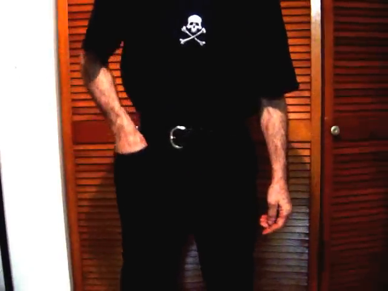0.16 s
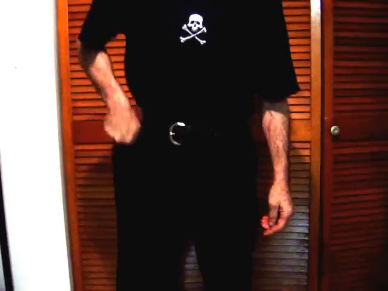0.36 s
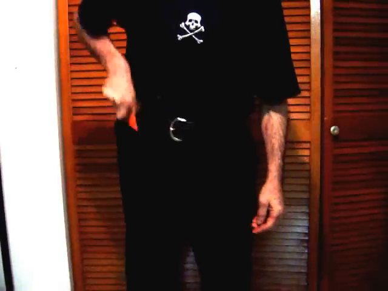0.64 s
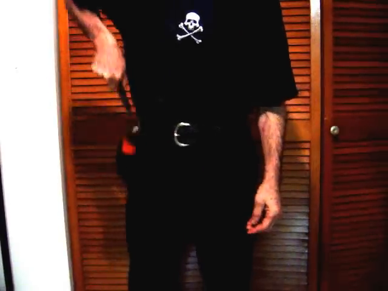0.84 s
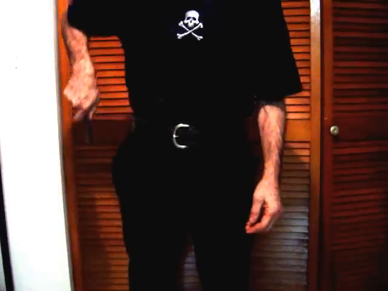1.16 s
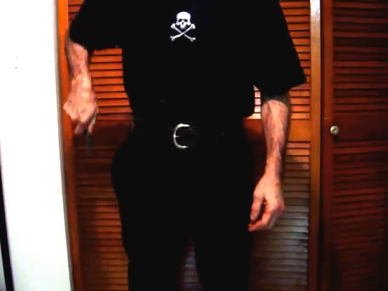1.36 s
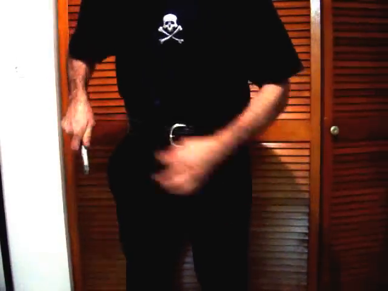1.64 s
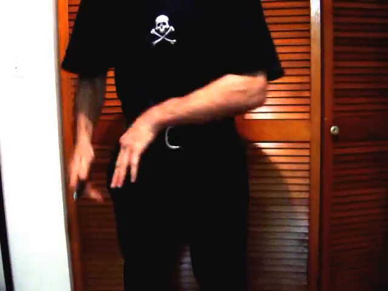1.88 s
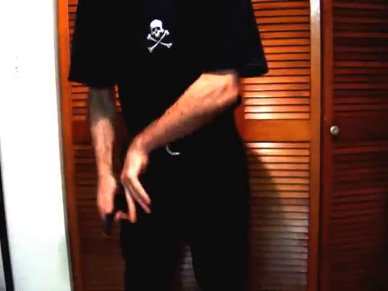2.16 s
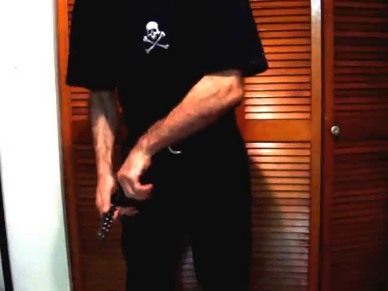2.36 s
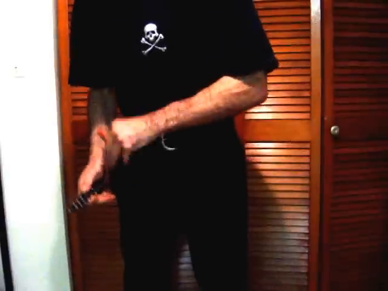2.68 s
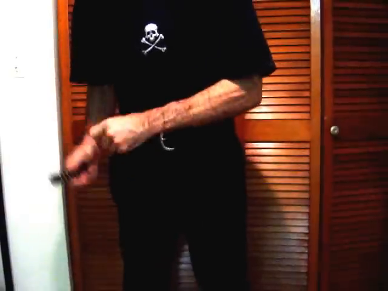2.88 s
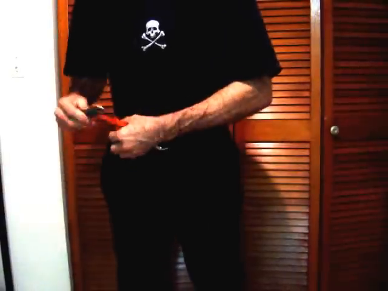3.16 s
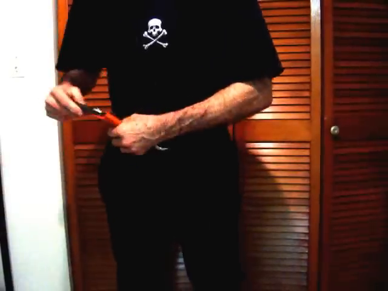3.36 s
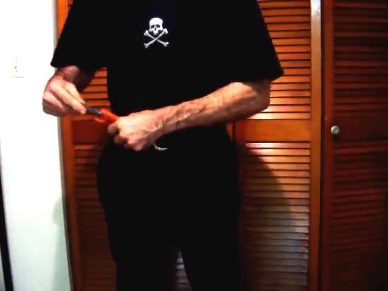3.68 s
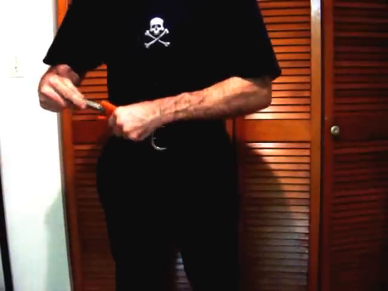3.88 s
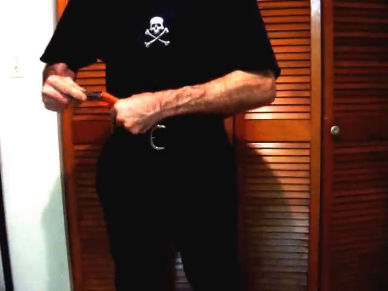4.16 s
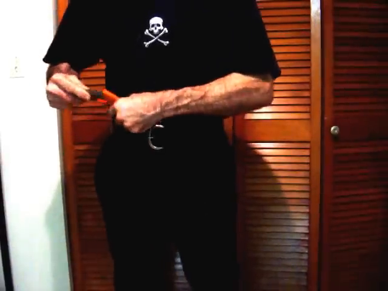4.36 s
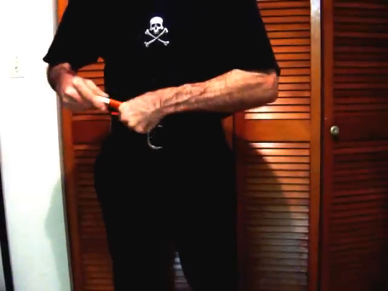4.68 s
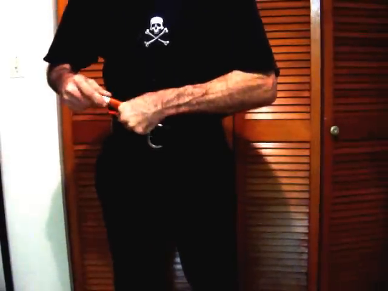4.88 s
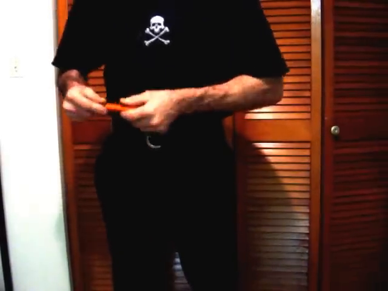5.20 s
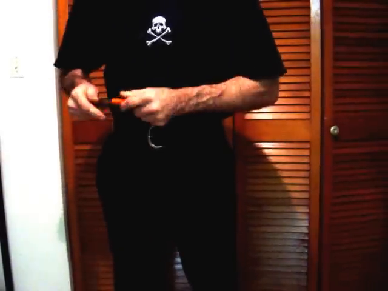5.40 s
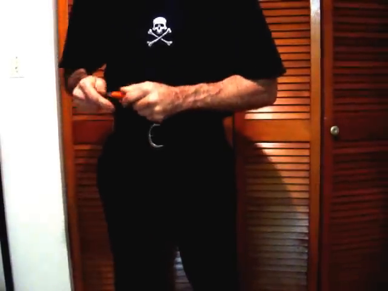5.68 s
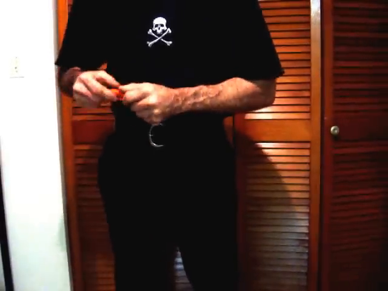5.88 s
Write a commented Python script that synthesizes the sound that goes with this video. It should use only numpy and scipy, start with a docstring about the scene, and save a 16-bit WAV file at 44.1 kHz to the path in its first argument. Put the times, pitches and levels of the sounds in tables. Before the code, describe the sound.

Steady hiss and a faint, fitful motor whir with tiny chirps near the microphone. Cloth rubs as a hand leaves a pocket, then a sharp loud knife clack with a short rattle. Soft rustles and small clicks follow, then a moderate clack, light ticks, two hard bright clacks and a final very loud snap. Small bare room, short echoes, rough mono microphone.

```python
"""Small bare room: a folding knife is drawn from a pocket sheath, flipped and pushed back.
Floor: flickering hiss and wavering mains partials. Motor near the microphone: narrow noise whir, sine chirps.
Cloth: two colours of noise swelling in strokes. Knife: contacts and rattle ring a bank of resonances,
heard with wall echoes and a tail. The recorder bends loud clacks, thumps, band-limits and clips."""
import sys
import numpy as np
from scipy import signal
from scipy.io import wavfile

SR = 44100
rng = np.random.default_rng(int(sys.argv[2]) if len(sys.argv) > 2 else 0)


def int16_out(signal):
    """Quantize to a 16-bit WAV file."""
    q = np.round(np.clip(np.atleast_2d(signal).T, -1, 1) * 32767)
    wavfile.write(sys.argv[1], SR, q.astype(np.int16))


N = 266187

# hiss colour, relative: f/Hz, level/dB per Hz
HISS_COLOUR = [(18, -42.5), (30, -18), (190, -1), (236, -3), (287, -1.5), (1170, -3), (1530, -13),
               (1960, -9), (9960, -13), (12900, -29.5), (21900, -120)]
# mains partials: f/Hz, mean level/dB rms
MAINS_PARTIALS = [(242.2, -68.5), (360.7, -70.5)]
# clearest motor chirps: t/s, length/s, first f/Hz, last f/Hz, level/dB before throb and flutter
CLEAR_CHIRPS = [(.008, 0.038, 1755, 1580, -48), (0.568, 0.04, 1640, 1630, -50.5),
                (0.657, 0.038, 1710, 1790, -49), (1.503, 0.043, 1710, 1650, -52),
                (0.054, 0.042, 1533, 1680, -41), (0.29, 0.042, 1503, 1646, -43),
                (2.397, 0.041, 1695, 1543, -40), (2.429, .1, 1935, 1906, -51),
                (2.536, 0.017, 1404, 1570, -46), (2.561, 0.037, 1380, 1205, -43.5),
                (2.796, 0.087, 1274, 1315, -46.5), (3.486, 0.085, 1530, 1550, -46.5),
                (3.607, 0.03, 1555, 1560, -43), (4.16, 0.0055, 1660, 1630, -40),
                (5.078, 0.064, 1755, 1630, -42), (5.297, 0.04, 1575, 1660, -41),
                (5.343, 0.027, 1270, 1330, -43), (5.402, 0.073, 1328, 1303, -44),
                (5.831, 0.059, 1645, 1565, -44.5)]
# cloth and skin strokes: t of most pressure/s, dull level/dB, bright level/dB, fade by a factor e/s
STROKES = [(.35, -51, -50.5, 0.1), (.464, -38.5, -41.5, 0.058), (0.796, -43.5, -41.5, 0.12),
           (.84, -41, -30, 0.016), (2.05, -56.5, -51.5, 0.14), (2.228, -47.5, -45.5, 0.16),
           (2.38, -58, -57, 0.16), (2.57, -52.5, -51, 0.1), (2.646, -45.5, -45, 0.016),
           (2.775, -56, -48.5, 0.13), (2.941, -63, -48, 0.051), (3.044, -58, -43, 0.068),
           (3.272, -59, -41.5, 0.08), (3.373, -44.5, -53, 0.01), (3.99, -53.5, -52.5, 0.043),
           (5.148, -58.5, -35, 0.063), (5.306, -72, -44.5, 0.042), (5.397, -61, -45.5, 0.049)]
# dull part of the rubbing, relative: f/Hz, level/dB per Hz
DULL_COLOUR = [(90, -21), (200, -6.5), (350, -0.5), (700, -2.5), (1200, -13), (2200, -22)]
# bright part of the rubbing, relative: f/Hz, level/dB per Hz
BRIGHT_COLOUR = [(700, -31), (1300, 2), (2000, 1), (3000, -4.5), (5000, -3.5), (8000, -6), (10500, -7.5)]
# resonances of handles, blade and sheath: f/Hz, T60/s
RESONANCES = [(400, 0.0097), (620, 0.012), (860, 0.0085), (1500, 0.0053), (2050, 0.0035), (2800, 0.0023),
              (3750, 0.0019), (5300, 0.00082), (8000, 0.00058)]
# drive of each resonance by a usual blow, one per row of RESONANCES: level/dB
USUAL_DRIVE_DB = [-31.5, -27, -20.5, -15.5, -15.5, -19, -15.5, -13.5, -10.5]
# clacks and clicks, levels relative: t/s, strength/dB, rattle/dB, favoured f/Hz,
# brightness/dB per octave, thud/dB, knock/dB
CLACKS = [(0.788, -26, -11, 400, 2, 14.5, -0.5), (0.831, -19, -6.5, 2800, 0, 6.5, -8),
          (0.861, 5.5, -13, 2050, -0.5, 3.5, 5.5), (0.89, -7, -5.5, 2050, 1, 7, 1.5),
          (2.232, -32.5, -16.5, 8000, 1.5, 11, 4.5), (2.641, -43, -11, 860, -8, 16, 0),
          (2.763, -36.5, 1, 2050, -7, 10, -4), (2.928, -40, 12, 2150, -4, -5, -10),
          (3.039, -33.5, 3, 2050, -0.5, -16, -14), (3.221, -19.5, -4.5, 2200, 0.5, -17.5, -3),
          (3.404, -7, -10, 2800, 2, 0.5, -5.5), (3.673, -18.5, -20.5, 2300, -0.5, -5.5, -6),
          (3.695, -26.5, -8, 5300, -2.5, 5.5, 1), (3.707, -18.5, -14, 2050, 0, -11, -24),
          (3.8, -31, -7, 2050, -0.5, -2, -22), (4.231, -15.5, 0.5, 2050, -4, 4.5, 8),
          (4.236, 5, -16, 3750, 0, -3.5, 4), (4.361, -17, -18.5, 2050, 2.5, -4, -1.5),
          (4.636, 6, -6.5, 5300, 1.5, -6.5, 2.5), (4.656, -4, -15, 5300, 4.5, 3.5, 9.5),
          (4.666, -5.5, -11.5, 5300, -4, 2, 10.5), (4.684, -10, -4, 5300, 1.5, -1, 2.5),
          (5.053, -33.5, -1.5, 5300, 2, 0.5, 8.5), (5.641, -17, -4, 2050, -0.5, -1, 5),
          (5.648, -18.5, 0, 5300, 5.5, 6, -5), (5.652, 10.5, -18.5, 2800, 0, -6.5, -21)]
# nearest walls: delay/s, level/dB re direct sound
WALL_ECHOES = [(.0085, -5), (.018, -7.5), (0.028, -20.5)]
# room tail: f/Hz, T60/s
TAIL_DECAY = [(150, 0.18), (500, 0.29), (1400, 0.36), (2500, 0.3), (5000, 0.32), (9000, 0.26)]

HISS_RMS_DB = -53.5
MAINS_HZ = 60
WHIR_HZ, WHIR_WIDTH_HZ = 1540, 330
WHIR_RMS_DB = -57.5   # before throb and flutter
OCTAVE_DB = -16   # second partial of a chirp re first
FAINT_CHIRPS = 14
FAINT_MEDIAN_S, FAINT_MEAN_HZ, FAINT_HZ_SPREAD = 0.032, 1620, 0.044   # spread as a share of pitch
FAINT_TOP_DB, FAINT_SPREAD_DB = -48.5, 7.5   # before throb and flutter
RISE_PER_FADE = 0.51   # rise time of a stroke as a share of its fade
RATTLE_FADE_S, RATTLE_TOUCHES_PER_S = 0.0037, 2000   # fade by a factor e
FAVOUR_DB, FAVOUR_OCTAVES = 8, 0.2   # lift near the pitch of the struck spot
THUD_TOP_HZ, KNOCK_TOP_HZ = 1100, 1700   # hand thuds below the first, sheath knocks between
RADIATION_WIDTH = 0.6   # share of its pitch over which a resonance radiates
KNIFE_GAIN_DB = 11
KNIFE_DELAY_S = 0.001448   # short delay before every knife sound
ECHO_BLUR_FADE_S = 0.00026   # random blur on each wall echo, fade by a factor e
TAIL_DB = -0.5   # tail energy re direct sound
CUTOFF_HZ, TOP_HZ = 10110, 15800   # recorder filters before and after the ceiling
CEILING = 0.95


def from_db(db):
    """Amplitude ratio of a level in dB."""
    return 10 ** (np.asarray(db) / 20)


def rms_one(x):
    """Scale to rms 1."""
    return x / np.sqrt(np.mean(x ** 2) + 1e-20)


def at_hz(points, hz):
    """Read a two-column table along log frequency."""
    f_hz, value = np.array(points).T
    return np.interp(np.log(hz), np.log(f_hz), value)


def drift(rate_hz):
    """Slow chance: low-passed noise, about rate_hz changes a second, spread 1."""
    step, settle = 40, 2000   # samples per slow step; slow steps dropped
    r = np.exp(-2 * np.pi * rate_hz * step / SR)
    noise = rng.standard_normal(N // step + settle + 2)
    slow = rms_one(signal.lfilter([1], [1, -2 * r, r * r], noise)[settle:])
    return np.interp(np.arange(N) / step, np.arange(len(slow)), slow)


def resonate(x, hz, width_hz):
    """Two-pole resonance, peak gain 1."""
    r = np.exp(-np.pi * width_hz / SR)
    zeros = np.array([1, 0, -1]) * (1 - r * r) / 2
    poles = [1, -2 * r * np.cos(2 * np.pi * hz / SR), r * r]
    return signal.lfilter(zeros, poles, x)


def bands(size):
    """Half-octave noise bands with centres in Hz; neighbours come from separate noises."""
    edges_hz = 25 * 2 ** np.arange(0, 9.1, 0.5)
    white = rng.standard_normal((2, size))
    for k, (low_hz, high_hz) in enumerate(zip(edges_hz, edges_hz[1:])):
        band_pass = signal.butter(2, [low_hz, high_hz], "band", fs=SR, output="sos")
        yield np.sqrt(low_hz * high_hz), signal.sosfilt(band_pass, white[k % 2])


def coloured(spectrum, patchy_db):
    """Noise of a given colour whose bands flicker partly in step; rms 1."""
    common, *separate = [drift(26) for _ in range(4)]
    out = np.zeros(N)
    for k, (hz, band) in enumerate(bands(N)):
        flicker_db = patchy_db * (common + separate[k % 3])
        out += from_db(at_hz(spectrum, hz) + flicker_db) * band
    return rms_one(out)


def hiss():
    """Noise of fixed colour with a slight flicker from band to band."""
    return from_db(HISS_RMS_DB) * coloured(HISS_COLOUR, patchy_db=1.27)


def hum():
    """Mains partials: sines of wavering level."""
    t_s = np.arange(N) / SR
    out = np.zeros(N)
    for hz, rms_db in MAINS_PARTIALS:
        level = np.sqrt(2) * from_db(rms_db + 4.4 * drift(5.8))
        out += level * np.sin(2 * np.pi * hz * t_s)
    return out


def faint_chirps():
    """Rows like CLEAR_CHIRPS, scattered in time, length, pitch and level."""
    t_s = rng.random(FAINT_CHIRPS) * (N / SR - 0.2)
    luck = rng.standard_normal((FAINT_CHIRPS, 4))
    hz = FAINT_MEAN_HZ * (1 + FAINT_HZ_SPREAD * luck[:, :2])
    length_s = FAINT_MEDIAN_S * np.exp(0.6 * luck[:, 2])
    level_db = FAINT_TOP_DB - FAINT_SPREAD_DB * np.abs(luck[:, 3])
    return list(zip(t_s, length_s, hz[:, 0], hz[:, 1], level_db))


def whir():
    """Narrow resonant noise in fits and starts."""
    noise = rng.standard_normal(N)
    for _ in range(2):
        noise = resonate(noise, WHIR_HZ, WHIR_WIDTH_HZ)
    fits_db = 15 * np.tanh(3.6 * drift(11.0) + 1.4)
    return from_db(WHIR_RMS_DB) * rms_one(noise * from_db(fits_db))


def chirps():
    """Short gliding tones of two partials with wobbling pitch."""
    out = np.zeros(N)
    wobble = 1 + 0.012 * drift(60)
    for t_s, length_s, first_hz, last_hz, level_db in list(CLEAR_CHIRPS) + faint_chirps():
        at, part = round(t_s * SR), np.linspace(0, 1, round(length_s * SR))
        span = slice(at, at + len(part))
        hz = (first_hz + (last_hz - first_hz) * part) * wobble[span]
        phase = 2 * np.pi * np.cumsum(hz) / SR
        tone = np.sin(phase) + from_db(OCTAVE_DB) * np.sin(2 * phase)
        out[span] += from_db(level_db) * np.sin(np.pi * part) ** 0.1 * tone
    return out


def motor():
    """Whir and chirps share a throb at the mains rate and a random flutter."""
    throb = 1 + 0.2 * np.sin(2 * np.pi * MAINS_HZ * np.arange(N) / SR)
    flutter = from_db(2.2 * drift(76))
    return (whir() + chirps()) * throb * flutter


def rubbing():
    """Fibres slip in clumps: dull and bright flickering noise, swelling and fading by strokes."""
    t_s, dull_power, bright_power = np.arange(N) / SR, np.zeros(N), np.zeros(N)
    for peak_s, dull_db, bright_db, fade_s in STROKES:
        slope_s = np.where(t_s < peak_s, RISE_PER_FADE * fade_s, fade_s)
        power = np.exp(-2 * np.abs(t_s - peak_s) / slope_s)
        dull_power += power * from_db(2 * dull_db)
        bright_power += power * from_db(2 * bright_db)
    dull = np.sqrt(dull_power) * coloured(DULL_COLOUR, patchy_db=1.5)
    bright = np.sqrt(bright_power) * coloured(BRIGHT_COLOUR, patchy_db=1.5)
    return dull + bright


def drive_db(favoured_hz, brightness_db_per_octave, thud_db, knock_db):
    """Usual drive, lifted near the favoured pitch, with thud, knock and a tilt above them."""
    hz = np.array(RESONANCES)[:, 0]
    near = np.exp(-0.5 * (np.log2(hz / favoured_hz) / FAVOUR_OCTAVES) ** 2)
    tilt_db = brightness_db_per_octave * np.log2(hz / 2000)
    part_db = np.select([hz < THUD_TOP_HZ, hz < KNOCK_TOP_HZ], [thud_db, knock_db], tilt_db)
    return np.array(USUAL_DRIVE_DB) + FAVOUR_DB * near + part_db


def blow_contacts(age_s):
    """One row a blow: a unit contact, then uneven random touches of loose play dying away."""
    rattle = from_db(np.array(CLACKS)[:, 2:3])
    touches = rng.random((len(CLACKS), len(age_s))) < RATTLE_TOUCHES_PER_S / SR
    uneven = touches * rng.standard_normal(touches.shape)
    contacts = rattle * uneven * np.exp(-age_s / RATTLE_FADE_S)
    contacts[:, 0] = 1
    return contacts


def knife():
    """Each blow's contact and rattle push all resonances, which ring down and radiate."""
    age_s = np.arange(2000) / SR
    pushes = np.zeros((len(RESONANCES), N + len(age_s)))
    for (t_s, strength_db, _, *colour), contact in zip(CLACKS, blow_contacts(age_s)):
        at = round(t_s * SR)
        drive = from_db(strength_db + drive_db(*colour))
        pushes[:, at:at + len(age_s)] += drive[:, None] * contact
    out = np.zeros(N)
    for k, ((hz, t60_s), push) in enumerate(zip(RESONANCES, pushes)):
        r, w = from_db(-60 / (t60_s * SR)), 2 * np.pi * hz / SR
        poles = [1, -2 * r * np.cos(w), r * r]
        ring = signal.lfilter([0, np.sin(w)], poles, push[:N] + 1e-18)   # offset avoids denormals
        out += (-1) ** k * resonate(ring, hz, RADIATION_WIDTH * hz)
    return from_db(KNIFE_GAIN_DB) * out


def room(x):
    """Delayed direct sound, blurred wall echoes and a lumpy tail that builds up and dies band by band."""
    age_s = np.arange(SR // 2) / SR
    # early on, single reflections stand out
    lumps = from_db(4 * drift(200)[:len(age_s)] * np.exp(-age_s / 0.06))
    tail = np.zeros(len(age_s))
    for hz, band in bands(len(age_s)):
        tail += band * from_db(-60 * age_s / at_hz(TAIL_DECAY, hz))
    tail *= lumps * (1 - np.exp(-age_s / 0.0013))
    response = from_db(TAIL_DB) * tail / np.sqrt(np.sum(tail ** 2))
    response[0] += 1
    for delay_s, level_db in WALL_ECHOES:
        blur = 1.2 * rng.standard_normal(200) * np.exp(-age_s[:200] / ECHO_BLUR_FADE_S)
        blur[0] = 1
        at = round(delay_s * SR)
        response[at:at + 200] += from_db(level_db) * blur / np.sqrt(np.sum(blur ** 2))
    silence = np.zeros(round(KNIFE_DELAY_S * SR))
    return np.r_[silence, signal.fftconvolve(x, response)][:N]


def scene():
    """Sum of floor, motor, cloth and the knife in the room, one channel."""
    return (hiss() + hum() + motor() + rubbing() + room(knife()))[None]


def record(dry):
    """Loud peaks bend and shift the working point (a low thump); band limit, hard ceiling, low-pass."""
    bent = 0.92 * np.tanh(dry / 0.96)
    shift_band = signal.butter(1, [5, 45], "band", fs=SR, output="sos")
    shift = signal.sosfilt(shift_band, bent ** 2)
    band_limit = signal.ellip(10, 0.5, 70, CUTOFF_HZ, fs=SR, output="sos")
    narrow = signal.sosfilt(band_limit, bent + 0.31 * shift)
    clipped = np.clip(narrow, -CEILING, CEILING)
    return signal.sosfilt(signal.cheby2(14, 95, TOP_HZ, fs=SR, output="sos"), clipped)


dry = scene()
out = record(dry)
int16_out(out)
```